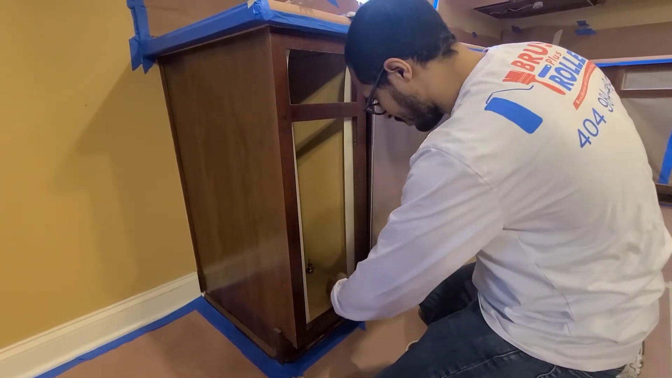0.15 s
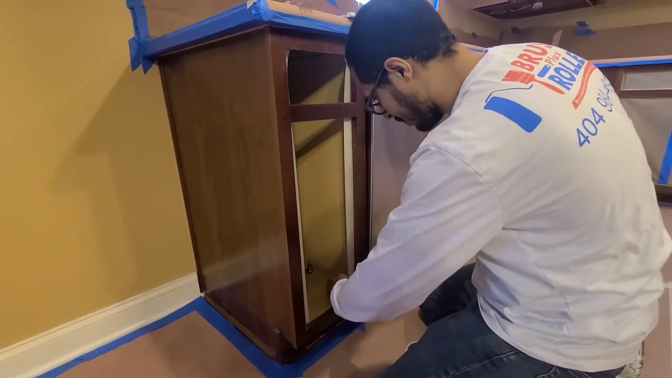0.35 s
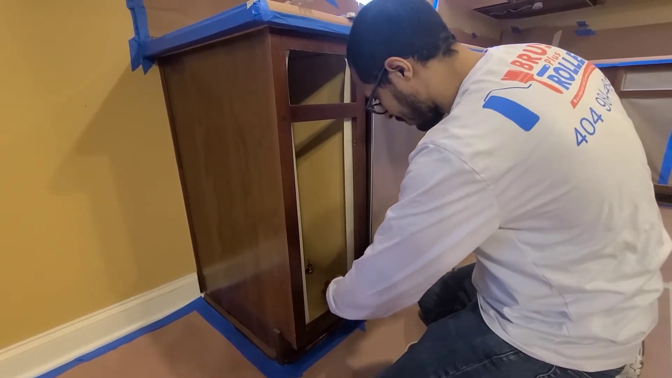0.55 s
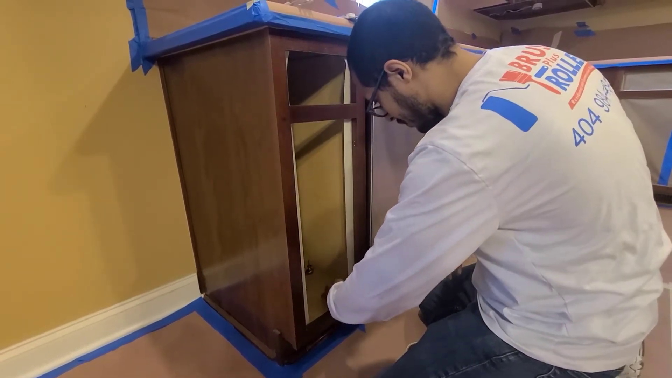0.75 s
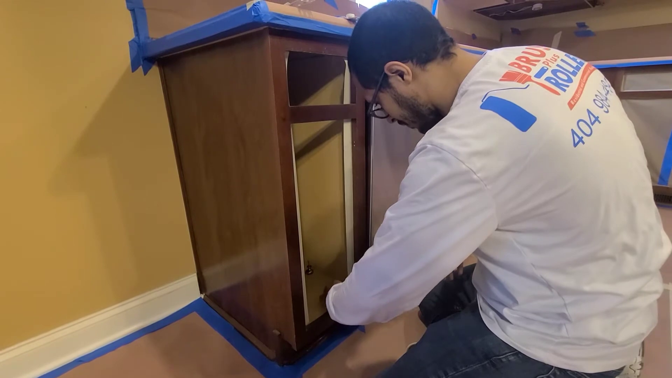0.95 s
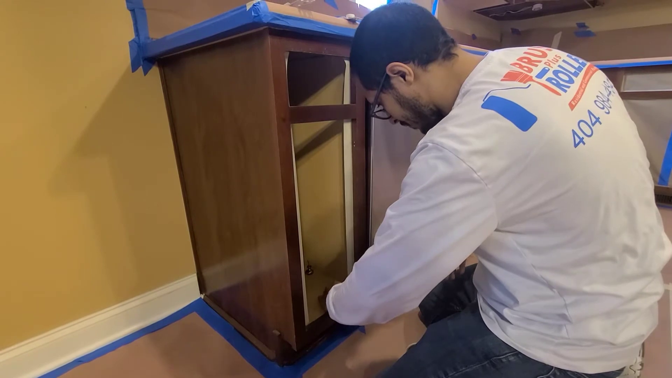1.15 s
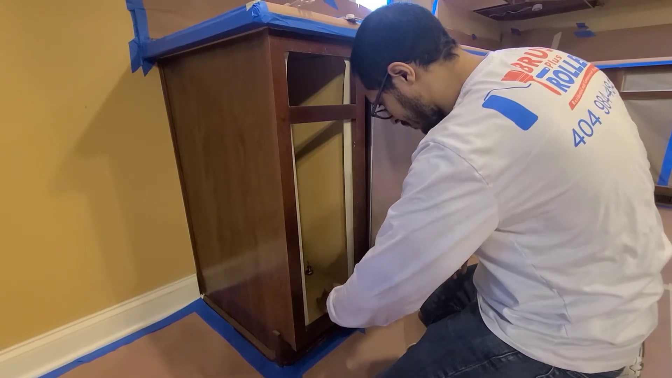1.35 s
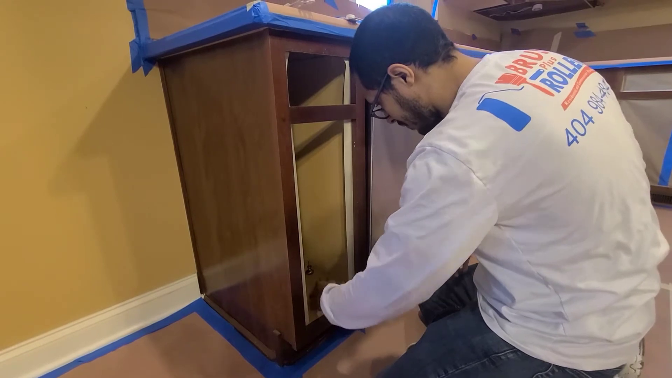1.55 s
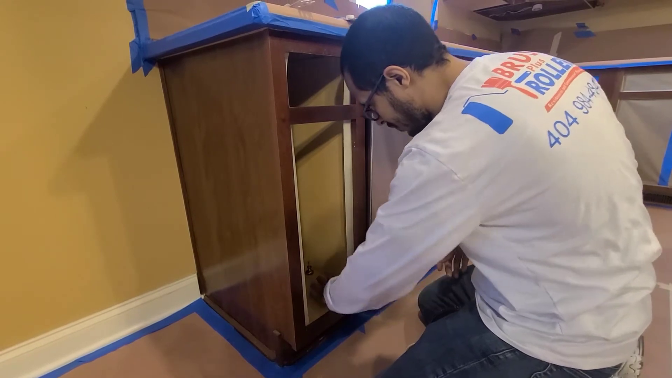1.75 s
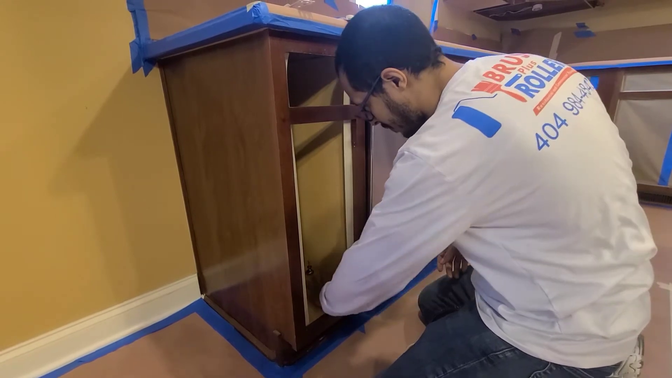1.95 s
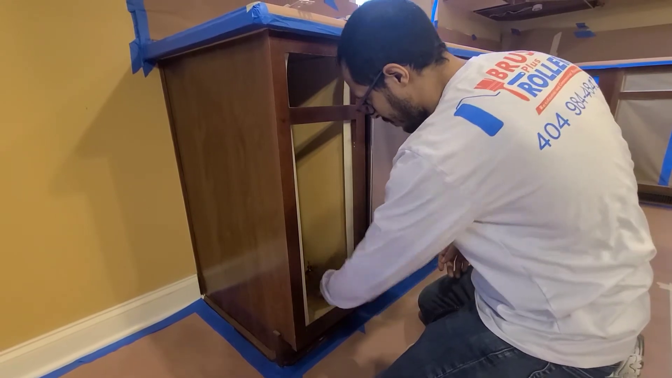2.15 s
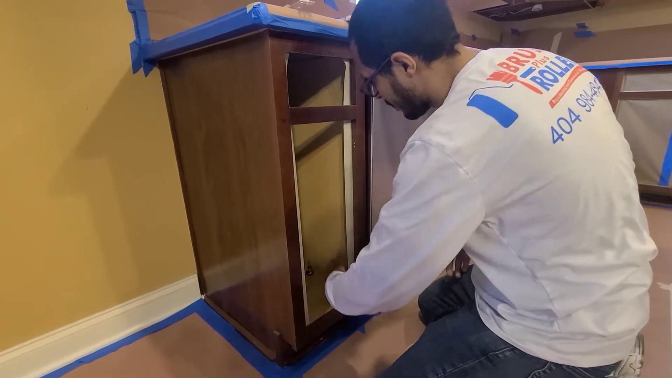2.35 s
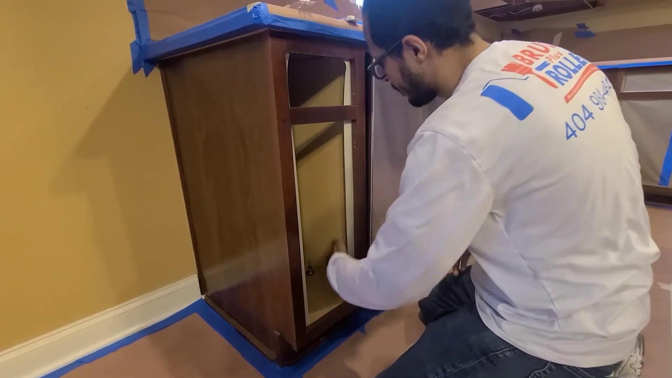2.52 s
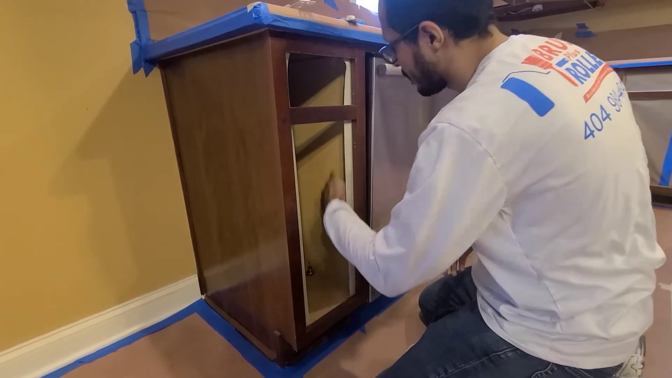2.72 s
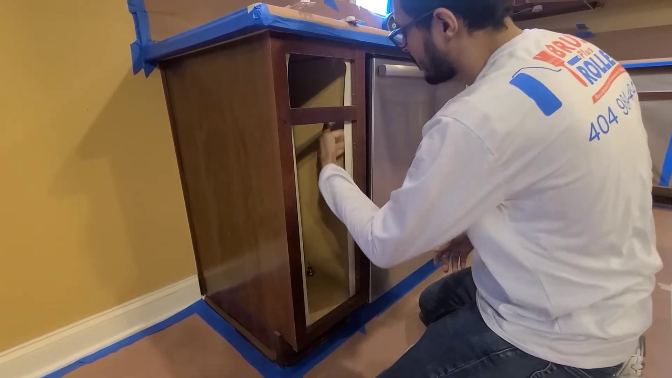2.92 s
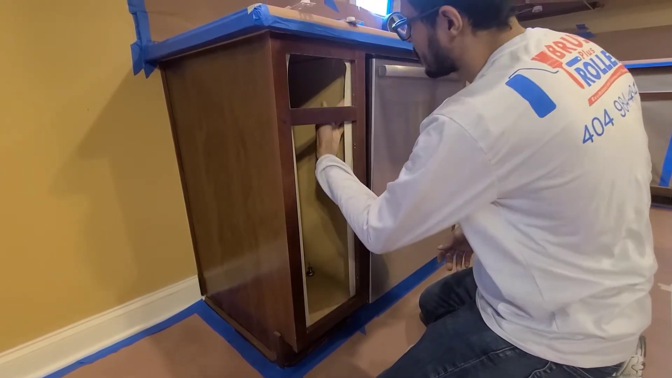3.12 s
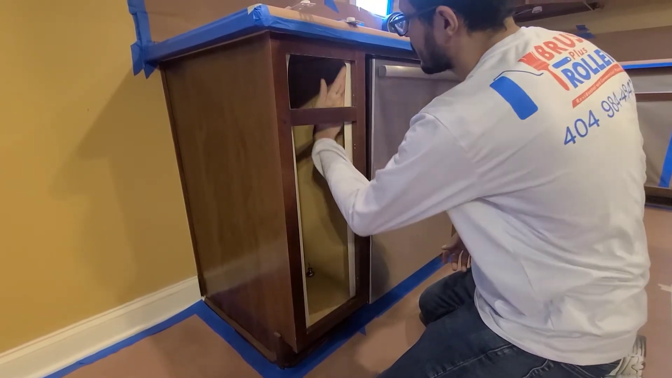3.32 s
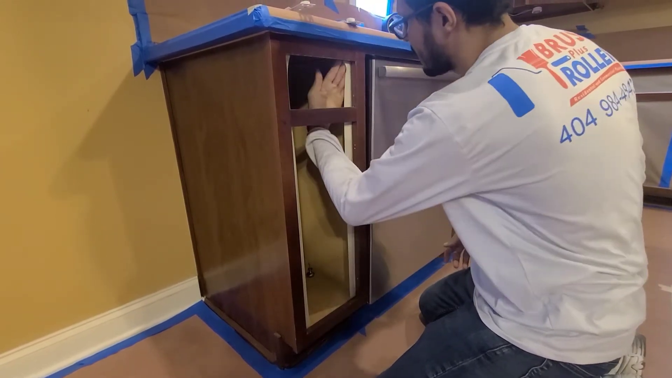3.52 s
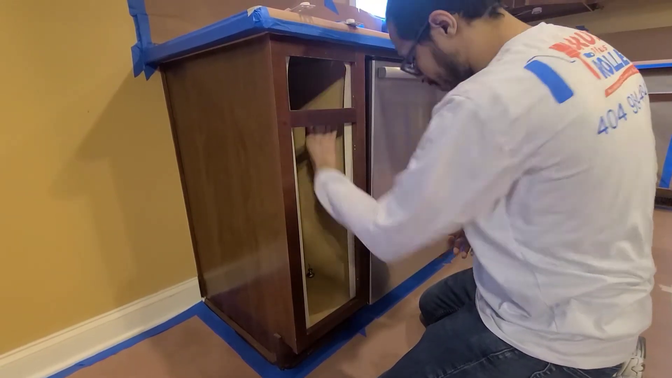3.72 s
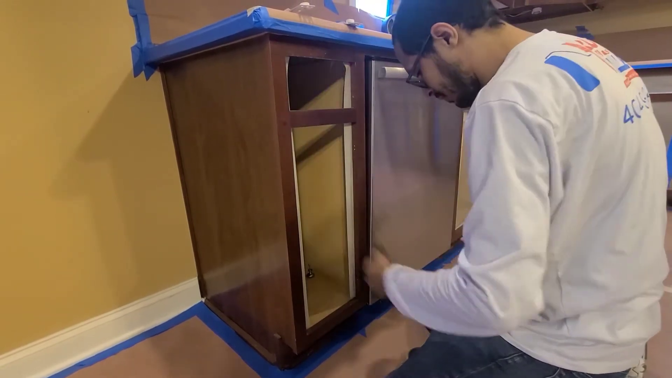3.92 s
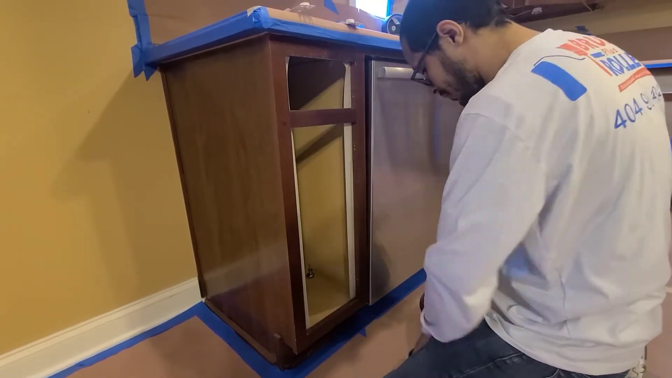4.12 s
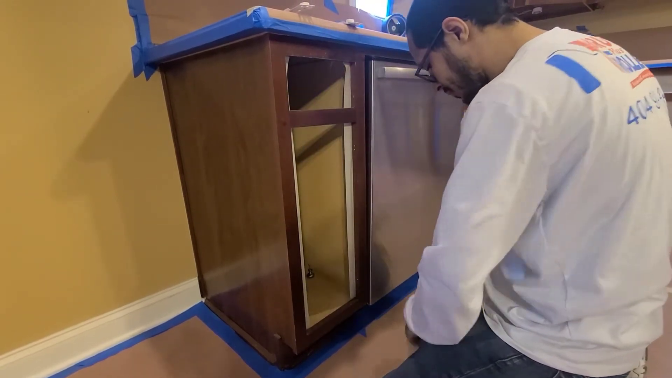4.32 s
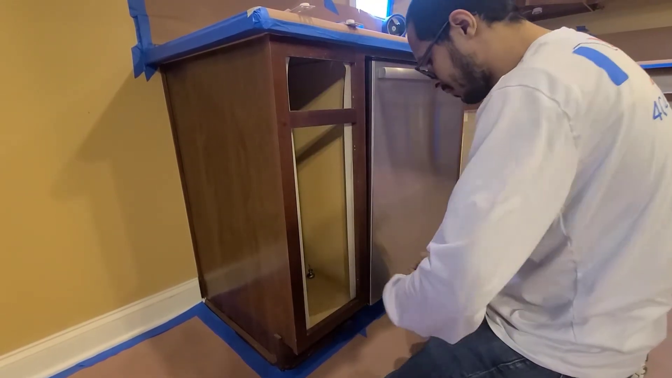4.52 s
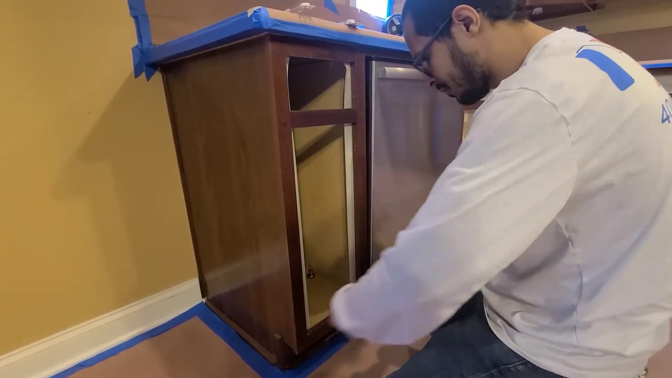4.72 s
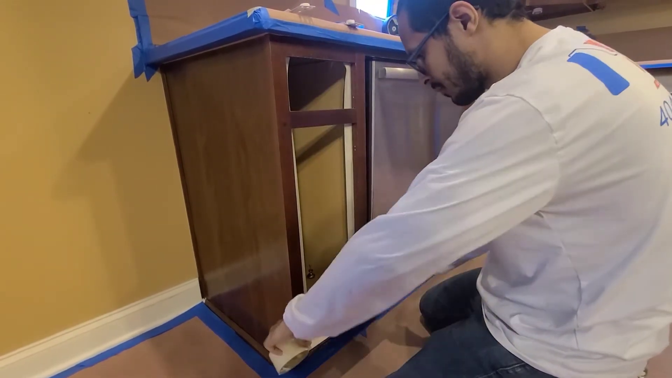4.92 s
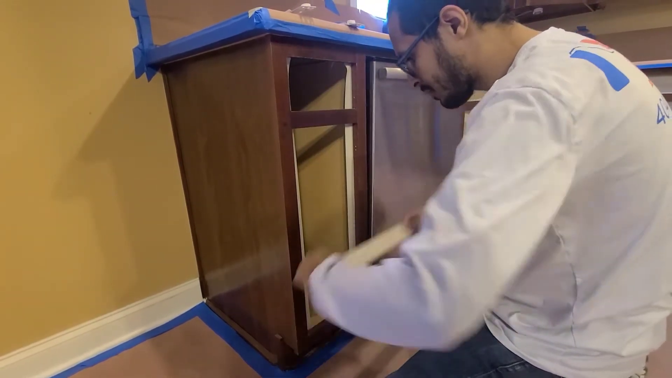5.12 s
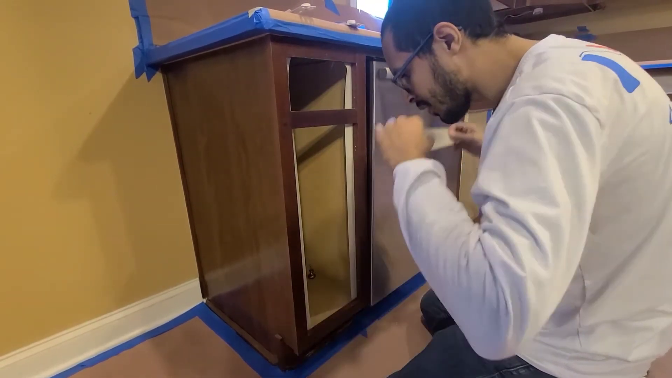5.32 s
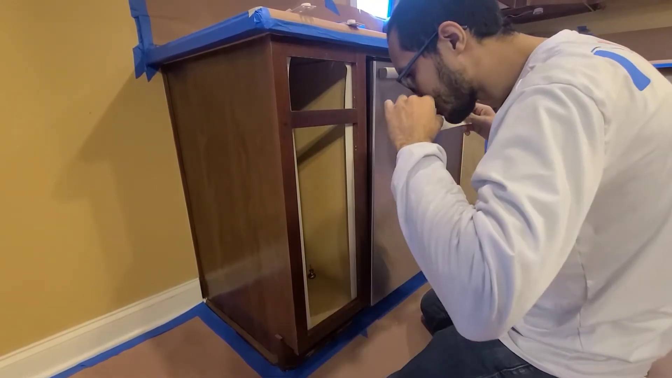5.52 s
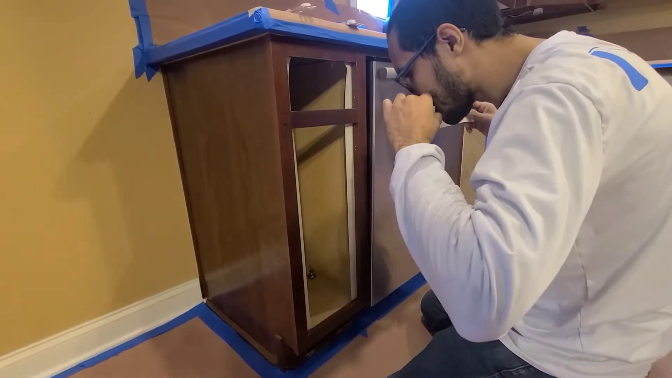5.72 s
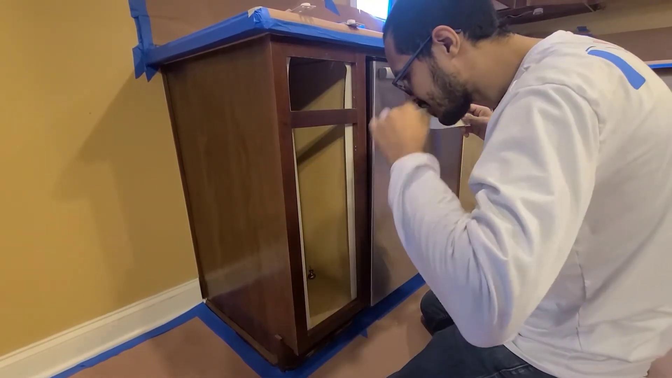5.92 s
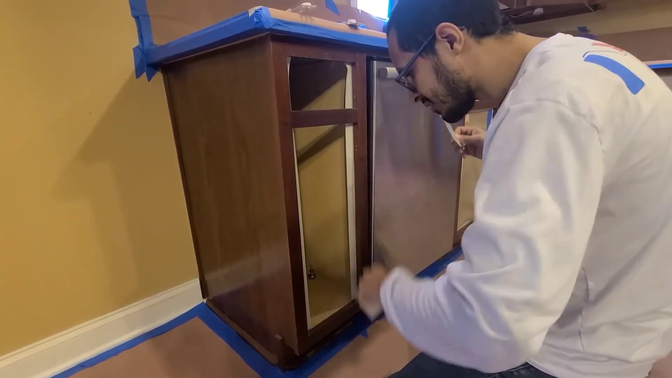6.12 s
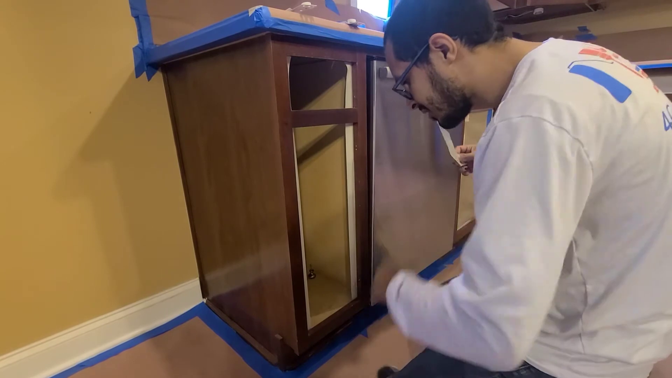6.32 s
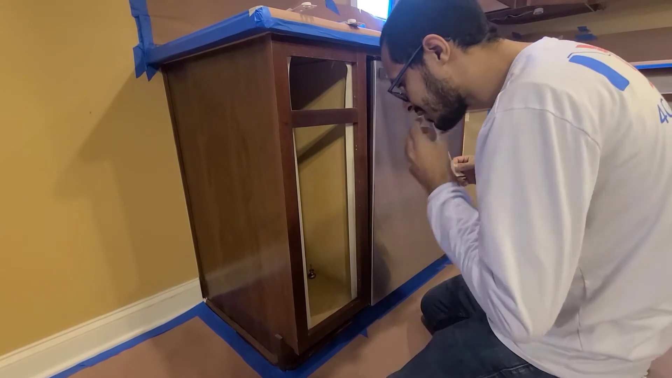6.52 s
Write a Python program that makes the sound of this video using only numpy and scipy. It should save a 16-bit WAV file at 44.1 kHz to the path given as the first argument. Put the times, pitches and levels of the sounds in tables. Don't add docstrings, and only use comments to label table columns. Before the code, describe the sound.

In a bare, live room with a faint low appliance hum, hands slide over paper inside a wooden cabinet: soft rustles, small squeaks, creases, a hard knock. A brief crumple follows, then another knock. Sticky ticks lead into a loud, ripping burst of masking tape; after a pause it tears with a crisp snap, and the roll drops on the floor with a double clack. Close stereo microphone.

```python
import sys
import numpy as np
from scipy import signal
from scipy.fft import rfft, irfft, next_fast_len
from scipy.io import wavfile
from scipy.ndimage import uniform_filter1d, minimum_filter1d, map_coordinates

SR = 44100
rng = np.random.default_rng(int(sys.argv[2]) if len(sys.argv) > 2 else 0)


def master(y):
    cut = np.clip(np.atleast_2d(y).T, -1, 1)
    pcm = np.round(cut * 32767)
    wavfile.write(sys.argv[1], SR, pcm.astype(np.int16))


def undo_db(level):
    steps = np.asarray(level, float) / 20
    return 10 ** steps


N = 293706


def unit(x):
    return x / np.sqrt(np.mean(x ** 2) + 1e-20)


def along(points, hz):
    f, v = np.transpose(points)
    return np.interp(np.log(hz + 1), np.log(f + 1), v)


def filtered(x, response):
    m = next_fast_len(x.shape[-1] + 8192)
    return irfft(rfft(x, m) * response(np.fft.rfftfreq(m, 1 / SR)), m)[..., :x.shape[-1]]


def pan(pan_db):
    return undo_db([[pan_db / 2], [-pan_db / 2]])


def add(track, s, sound):
    part = track[..., round(s * SR):][..., :sound.shape[-1]]
    part += sound[..., :part.shape[-1]]


def wobble(rate):
    at = np.arange(0, N + 16, 16)
    knots = rng.standard_normal(int(N * rate / SR) + 4)
    return np.interp(np.arange(N), at, map_coordinates(knots, [at * rate / SR]))


def gains(rows, grows=1):
    s, db = np.transpose(rows)
    out, t = np.zeros(N), np.arange(s[0], s[-1], 1 / SR)
    swing_db = grows * (db - db.max())
    add(out, s[0], undo_db(np.interp(t, s, db.max() + swing_db)))
    return out


def swells(rows, lift_db=0):
    s, rise, fall, db = np.array([row[:4] for row in rows]).T[..., None]
    t = np.arange(0, N / SR + .002, .001)
    late = t - s
    drop = np.where(late < 0, -late / np.abs(rise), late / np.abs(fall))
    return np.interp(np.arange(N) / SR, t, undo_db(db + lift_db - 20 * drop).sum(axis=0))


def crackle(spectrum, rate, spread_db, clumps, clump_db):
    size = undo_db(spread_db * np.minimum(rng.exponential(1, N), 3))
    bonds = (rng.random(N) < rate / SR) * rng.standard_normal(N) * size
    bunched = bonds * undo_db(clump_db * wobble(clumps))
    return unit(filtered(bunched, lambda hz: undo_db(along(spectrum, hz))))


def ring(rows, hz, t60):
    out, t = np.zeros(N), np.arange(SR // 4) / SR
    for s, db, *_ in rows:
        add(out, s, undo_db(db - 60 * t / t60) * np.sin(2 * np.pi * hz * t))
    return out


def struck(spectrum, size=8192):
    level = undo_db(along(spectrum, np.fft.rfftfreq(size, 1 / SR)))
    cepstrum = irfft(np.log(level + 1e-6))
    cepstrum[1:size // 2] *= 2
    cepstrum[size // 2 + 1:] = 0
    return irfft(np.exp(rfft(cepstrum)))


def slips(rows, lift_db, cycles, rough):
    out = np.zeros((2, N))
    for s, db, hz, pan_db in rows:
        turns = np.arange(SR // 40) / SR * hz / cycles

        def band(f):
            return 1 / (1 + (1.5 * np.log((f + 1) / hz)) ** 4) / (1 + (f / 6600) ** 16)

        rasp = unit(filtered(rng.standard_normal(len(turns)), band))
        tone = np.sqrt(2) * np.sin(2 * np.pi * (turns * cycles + rng.random()))
        shape = undo_db(db + lift_db) * turns * np.exp(1 - turns)
        add(out, s - cycles / hz, shape * (tone + rough * rasp) * pan(pan_db))
    return out


# f/Hz, correlation/1
LIKENESS = [(60, -0.35), (150, 0.93), (380, 0.91), (950, 0.056), (2380, -0.035), (5980, -0.092),
            (15000, -0.16)]


def ports(pair):
    def turn(hz):
        return np.arccos(np.clip(along(LIKENESS, np.maximum(hz, 140)), -1, 1)) / 2

    def mid_side(hz):
        return np.sqrt(2) * np.array([np.cos(turn(hz)), np.sin(turn(hz))])

    mid, side = filtered(pair, mid_side)
    return np.array([mid + side, mid - side]) / np.sqrt(2)


# f/Hz, T60/s
ROOM_T60 = [(100, 0.45), (700, 0.55), (2500, 0.52), (5000, 0.43), (9000, 0.32), (15000, 0.27)]


def paths(near_db, far_db):
    hz, t, z = signal.stft(rng.standard_normal((2, SR * 2 // 3)), SR, nperseg=256)
    tail = signal.istft(z * undo_db(-60 * t / along(ROOM_T60, hz)[:, None]), SR, nperseg=256)[1]
    t = np.arange(tail.shape[1]) / SR
    tail = ports(tail) * np.clip(t / 0.00076, 0, 1)
    near = ports(rng.standard_normal(tail.shape)) * undo_db(-60 * t / 0.032) * np.clip(t / 0.00052, 0, 1)
    answer = undo_db(far_db) * tail / np.linalg.norm(tail[0]) + undo_db(near_db) * near / np.linalg.norm(near[0])
    answer[:, 0] = 1
    spectrum = rfft(answer, SR)
    power = uniform_filter1d(np.abs(spectrum) ** 2, size=200, axis=1)
    return irfft(spectrum / np.sqrt(power), SR)[:, :len(t)]


def room(x, near_db, far_db, pan_db, count=1, dwell=.04):
    x, heard = np.atleast_2d(x), np.zeros((2, N))
    start, end = np.flatnonzero(np.abs(x[0]) > 1e-8)[[0, -1]]
    place = np.arange(start, end) / SR / dwell
    for k in range(count):
        away = np.abs((place - k + count / 2) % count - count / 2)
        share = np.cos(np.pi / 2 * np.clip(away, 0, 1)) if count > 1 else 1
        add(heard, start / SR, signal.fftconvolve(x[:, start:end] * share, paths(near_db, far_db), axes=1))
    return heard * pan(pan_db)


# f/Hz, level/dB
AIR = [(12, -35), (20, -11), (43, -1), (68, -3.5), (113, -15.5), (167, -14.5), (203, -13), (920, -27),
       (1150, -21), (1360, -26), (3520, -34.5), (6150, -43.5), (7270, -63.5), (11400, -55.5), (15900, -61)]
# f/Hz, density/dB per Hz
BOARDS = [(12, -51), (30, -23.5), (48, -6), (80, 9), (105, 3), (140, -34.5), (300, -120)]
# t/s, rise/s, fall/s, level/dB
SHIFTS = [(.2, .2, .2, -59), (1.13, 0.18, .2, -63), (2.0, 0.26, 0.087, -58), (2.3, 0.044, 0.052, -42),
          (2.53, 0.048, 0.24, -48), (3.1, 0.026, .2, -48), (3.68, 0.043, .2, -49.5),
          (4.13, 0.14, 0.11, -57), (4.31, 0.34, 0.17, -50), (4.86, 0.22, 0.11, -48.5), (5.3, .2, 0.21, -55),
          (5.8, 0.061, 0.094, -51), (5.92, 0.033, 0.052, -46)]


def air():
    t = np.arange(N) / SR
    phase = 2 * np.pi * np.cumsum(np.where(t < 1.17, 55.95, 57)) / SR
    hum = undo_db(-51.5 + 5 + 1.2 * wobble(9)) * np.sin(phase)
    fan_hz = 163.5
    fan = unit(filtered(rng.standard_normal(N), lambda hz: 1 / (1 + ((hz - fan_hz) / 5) ** 2))) * undo_db(-71)
    fan = fan + undo_db(-61) * np.sin(2 * np.pi * fan_hz * t + 0.5 * wobble(8))
    hiss = filtered(ports(rng.standard_normal((2, N))),
                    lambda hz: undo_db(along(AIR, hz)) * (np.abs(hz - 57) > 9))
    boards = (swells(SHIFTS) + undo_db(-75)) * crackle(BOARDS, 1200, 0.88, 9.0, 0.99)
    return undo_db(-56.5 + 2 + 0.35 * wobble(1.8)) * unit(hiss) + (hum + fan + boards) * pan(-0.8)


# f/Hz, density/dB per Hz
PAPER = [(410, -12), (700, -1.5), (851, -7.5), (1120, -2.5), (1910, -3.5), (2230, -7.5), (3670, -3.5),
         (5870, -16), (7200, -33), (9360, -61.5), (15800, -120)]
# f/Hz, density/dB per Hz
SHEEN = [(4240, -27.5), (7200, -9.5), (7600, -11), (11700, -3), (15500, -8)]
# f/Hz, density/dB per Hz
BODY = [(59, -35), (100, 1), (146, -8.5), (270, 0), (353, -4.5), (756, -9.5), (1000, -39), (1300, -54),
        (2200, -120)]
# t/s, rise/s, fall/s,
# rustle level/dB, fizz over it/dB
STROKES = [(0.0, 0.0086, 0.36, -46.5, -24), (.404, 0.011, 0.017, -52.5, -28),
           (0.578, 0.025, 0.087, -47.5, -20), (1.22, 0.041, 0.023, -55, -27), (1.455, 0.2, 0.1, -57, -34.5),
           (1.695, 0.059, 0.11, -57.5, -35), (1.91, 0.096, 0.15, -49.5, -16),
           (2.24, 0.0032, 0.01, -51.5, -42), (2.46, 0.067, 0.61, -46, -21), (2.59, 0.08, 0.1, -50, -18),
           (2.78, 0.14, 0.07, -41, -3.5), (3.02, 0.17, 0.46, -63.5, -34.5), (3.33, .6, 0.12, -53.5, -15),
           (3.502, 0.04, 0.059, -53.5, -27), (4.099, 0.013, 0.064, -50.5, -24),
           (4.24, 0.14, 0.2, -61.5, -19), (4.438, 0.027, 0.1, -59.5, -12), (4.495, 0.019, 0.03, -49, -3),
           (4.625, 0.036, .01, -55.5, -11.5), (5.26, 0.052, .08, -64.5, -32),
           (5.659, 0.018, 0.017, -42.5, -33.5), (5.77, 0.039, 0.19, -54.5, -9),
           (6.256, 0.024, 0.0045, -40, -34.5)]
# t/s, rise/s, fall/s, level/dB
LEANS = [(.02, 0.075, 0.48, -54), (.405, .015, 0.026, -55), (.455, .015, 0.015, -64), (.56, 0.12, .25, -69),
         (1.22, 0.063, 0.049, -59.5), (1.45, 0.061, 0.12, -58.5), (1.7, 0.12, 0.11, -53.5),
         (2.24, 0.0082, 0.077, -42), (2.59, 0.045, 0.082, -55), (2.77, 0.44, 0.43, -48.5),
         (3.11, .1, 0.11, -70), (3.335, 0.1, 0.25, -56.5), (4.102, 0.017, 0.05, -38),
         (4.15, 0.017, 0.083, -42.5), (4.438, 0.036, 0.018, -50.5), (5.3, 0.17, .3, -67.5)]


def hands():
    fizz = swells(STROKES, np.array(STROKES)[:, -1:]) * crackle(SHEEN, 5300, 2.2, 62, 1.9)
    paper = swells(STROKES) * crackle(PAPER, 7000, 2.7, 60, 0.82)
    wood = (swells(LEANS) + undo_db(-65.5)) * crackle(BODY, 1500, 1.5, 25, 2)
    return paper + fizz + wood


# t/s, length/s, start f/Hz, end f/Hz, level/dB
SQUEAKS = [
    (.01, 0.125, 3240, 3200, -63.5),
    (0.197, .095, 1985, 1982, -59),
    (.3, 0.09, 2000, 1980, -74),
    (0.502, 0.045, 4430, 4400, -71),
    (1.88, .08, 860, 850, -66),
    (2.307, .08, 2050, 1510, -67),
    (2.336, 0.07, 2550, 2200, -66),
    (2.406, .065, 2070, 2090, -57.5),
    (5.5, 0.03, 770, 752, -64),
]


def squeaks():
    out = np.zeros(N)
    shake, drift = undo_db(1.6 * wobble(90)), .7 * wobble(150)
    for s, length, start_hz, end_hz, db in SQUEAKS:
        t = np.arange(int(length * SR)) / SR
        glide_hz = start_hz + (end_hz - start_hz) * t / length
        phase = 2 * np.pi * np.cumsum(glide_hz) / SR + drift[round(s * SR):][:len(t)]
        octave = undo_db(-13) * min(1, 2000 / start_hz) ** 2 * np.sin(2 * phase)
        shape = undo_db(db + 9.5) * np.sin(np.pi * t / length) ** 0.099
        add(out, s, shape * (np.sin(phase) + octave))
    return out * shake


# f/Hz, density/dB per Hz
EDGE = [(2410, -29.5), (4100, -14.5), (5190, -7), (6460, -7), (7100, -19.5), (9230, -43.5), (15600, -120)]
# t/s, rise/s, fall/s, level/dB
SCUFFS = [(.04, 0.12, 0.15, -60), (1.91, 0.056, .1, -60.5), (2.47, 0.072, 0.16, -57.5),
          (2.58, .1, 0.1, -63.5), (2.99, .05, 0.28, -67), (2.72, 0.047, .05, -49), (2.79, .07, 0.036, -46),
          (3.34, 0.19, 0.048, -62.5), (4.1, 0.012, .08, -60.5), (4.5, 0.014, .05, -56),
          (4.618, .03, .03, -51.5), (5.75, 0.011, 0.095, -52)]


def scuffs():
    return swells(SCUFFS) * crackle(EDGE, 6000, 2.5, 90, 1.5)


def snaps(rows, t60):
    out, t = np.zeros((2, N)), np.arange(SR // 8) / SR
    for s, db, colour_hz, fizz_db, pan_db in rows:
        def colours(hz):
            peak = 0.056 + 1 / (1 + (3 * np.log((hz + 1) / colour_hz)) ** 2)
            broad = peak / (1 + (hz / 6800) ** 16) / (1 + (700 / (hz + 1)) ** 3)
            return np.array([broad, undo_db(along(SHEEN, hz))])

        noise = filtered(rng.standard_normal((2, len(t))), colours)
        pop = (1300 / colour_hz) ** 2 * np.sin(2 * np.pi * colour_hz * t)
        burst = unit(noise[0]) + pop + undo_db(fizz_db) * unit(noise[1])
        add(out, s, burst * undo_db(db - 2.0 - 60 * t / t60) * pan(pan_db))
    return out


# t/s, peak level/dB, colour f/Hz, fizz/dB, left-right/dB
CREASES = [(0.0715, -36, 3000, -34, -4), (0.175, -49, 3240, -36, -1), (0.4021, -40.5, 1150, -31, -3),
           (0.4445, -36.5, 1360, -50, 0), (0.5748, -47, 3240, -38, 6.5), (1.2223, -42.5, 1630, -19, 1),
           (1.6355, -45.5, 1510, -41.5, -4), (1.677, -45, 1620, -41, 0), (2.6923, -45, 1210, -10, 0.5),
           (2.7063, -37.5, 1820, 3.5, -3), (2.7334, -36, 1120, -2.5, -9), (2.7484, -45, 1170, -12.5, 3.5),
           (2.7637, -32, 3690, -11.5, -9.5), (3.046, -40, 3900, -34, -7), (3.0887, -54, 3065, -33, -2.5),
           (3.507, -40, 3300, -30, -1), (4.2347, -56, 1005, -30, -2)]
# t/s, peak level/dB, colour f/Hz, fizz/dB, left-right/dB
TACKS = [
    (4.4262, -51, 1060, -40, -5),
    (4.4366, -36.5, 2920, -25.5, -3.5),
    (4.4805, -40.5, 5900, -27.5, -16.5),
    (4.4877, -31, 5740, -8.5, -10.5),
    (4.616, -35.5, 6000, -29, -0.5),
    (4.6337, -23.5, 3610, -19, -6),
    (5.6531, -27, 3100, -21.5, -2.5),
    (5.741, -21.5, 1970, -21, -3),
    (5.7834, -51, 3320, 4, -7.5),
    (6.543, -61, 5000, 4.5, -6),
]


def clicks():
    return snaps(CREASES, t60=0.011) + snaps(TACKS, t60=0.0061)


# t/s, peak level/dB, f/Hz, left-right/dB
DENTS = [
    (.177, -44, 3300, 0),
    (.446, -37.5, 1330, -1),
    (1.99, -58, 3700, -1),
    (2.03, -55, 3800, -1),
    (2.06, -56, 3650, -1),
]


def dents():
    return slips(DENTS, lift_db=-1, cycles=1.35, rough=0.53)


# t/s, peak level/dB, click level/dB
KNOCKS = [
    (2.23, -28.5, -6.5),
    (2.275, -39.5, -72),
    (3.095, -54, -50),
    (4.094, -37.5, -8.5),
    (4.149, -46.5, -20),
    (4.225, -50.5, -9.5),
]
# f/Hz, level/dB, T60/s
PANEL_MODES = [(110, 1, 0.13), (170, -2, 0.048), (261, -3.5, 0.09), (414.6, -1.5, 0.061),
               (557.4, -1, 0.058), (760, 4, .05), (1166, -2, 0.034)]


def knocks():
    out, t = np.zeros(N), np.arange(SR // 3) / SR
    for s, db, click_db in KNOCKS:
        panels = 0
        for hz, level, t60 in PANEL_MODES:
            panels = panels + undo_db(level + rng.normal(0, 6.0) - 60 * t / t60) * np.sin(2 * np.pi * hz * t)
        click = unit(filtered(rng.standard_normal(len(t)),
                              lambda hz: undo_db(along(PAPER, hz)) / (1 + (hz / 4300) ** 4)))
        click = click * undo_db(click_db + 7.5 - 60 * t / 0.032)
        add(out, s, undo_db(db - 7) * (panels + click) * (1 - np.exp(-t / 0.001)))
    return out


# t/s, peak level/dB, f/Hz, left-right/dB
CRUMPLES = [(2.6843, -52, 2080, -3), (2.6988, -41, 1790, -1), (2.7055, -46, 3200, 0),
            (2.7201, -33.5, 3250, -2), (2.7263, -44, 3350, -2), (2.7341, -40, 3550, -3),
            (2.7511, -32, 3800, -4), (2.7583, -51, 3020, -1), (2.7654, -33.5, 3460, -5),
            (2.7742, -43, 3170, 0), (2.7808, -37, 3180, -2), (2.792, -37.5, 3440, 0),
            (2.8122, -43, 1760, -1), (2.8212, -46, 1720, -8), (2.8282, -67, 2810, -4)]
# t/s, peak level/dB, f/Hz, left-right/dB
STICKS = [(4.4854, -43.5, 5810, -6), (4.4895, -34.5, 5680, -5), (4.4951, -37, 5580, -6.5),
          (4.5003, -40, 5350, -4.5), (4.5049, -43, 4910, -3), (4.509, -44, 5360, -4),
          (4.5182, -44.5, 5170, -3), (4.5225, -50.5, 5730, -2)]


def touches():
    return slips(CRUMPLES, lift_db=-7, cycles=4.3, rough=1.1) + slips(STICKS, lift_db=-4.5, cycles=6.4, rough=0.98)


# t/s, level/dB
PEEL = [
    (4.633, -38),
    (4.644, -24.5),
    (4.675, -26.5),
    (4.705, -17.5),
    (4.73, -19),
    (4.757, -18),
    (4.8, -22.5),
    (4.82, -19.5),
    (4.885, -42.5),
]
# f/Hz, density/dB per Hz
GLUE = [(500, -38.5), (850, -6), (885, -17.5), (1050, -10.5), (1640, -9), (2530, -10), (4300, -5.5),
        (5590, -17), (9460, -120)]
# f/Hz, density/dB per Hz
FIZZ = [(4240, -32), (7200, -6), (8290, -6.5), (11800, -6), (15500, -8)]
# f/Hz, density/dB per Hz
SPAN = [(59, -53), (100, -23), (372, 1.5), (591, -0.5), (891, -19), (1100, -21.5), (1430, -23.5),
        (2420, -120)]
# t/s, rise/s, fall/s, level/dB
JERKS = [
    (4.68, 0.017, 0.061, -41),
    (4.725, 0.082, 0.021, -36.5),
    (4.82, 0.093, 0.088, -32.5),
]
# t/s, peak level/dB
TWANGS = [
    (4.706, -23),
    (4.836, -28.5),
]


def peel():
    effort = gains(PEEL)
    tugs = crackle(SPAN, 500, 4.8, 70, 1.84) * swells(JERKS) * (effort > 1e-6)
    edge = undo_db(-4.5) * crackle(EDGE, 12000, 1.3, 220, 2.1)
    fizz = undo_db(-7) * gains(PEEL, grows=0.83) * crackle(FIZZ, 14200, 1.6, 160, 0.73)
    glue = effort * (crackle(GLUE, 8000, 3.2, 150, 1.0) + edge)
    return glue + fizz + tugs + ring(TWANGS, hz=270, t60=0.13)


# t/s, peak level/dB, f/Hz, left-right/dB
RIPS = [(4.6421, -20.5, 3770, -1), (4.6518, -22.5, 3570, -0.5), (4.6662, -24, 3210, -1.5),
        (4.6764, -22, 4130, 1.5), (4.6868, -17.5, 3780, -1.5), (4.6928, -15, 3240, -1),
        (4.6986, -12.5, 2400, -5), (4.7091, -13.5, 2370, 0), (4.7265, -17.5, 1296, -2),
        (4.7339, -18, 1990, -1), (4.7393, -15.5, 4690, -2.5), (4.75, -9.5, 2980, -3),
        (4.7566, -12, 2890, -1), (4.7676, -12, 3340, -0.5), (4.7774, -15, 4185, -1), (4.7834, -15, 6230, 4),
        (4.7973, -14.5, 5630, -1), (4.8035, -19.5, 3930, 0.5), (4.8097, -13.5, 3904, 2.5),
        (4.8276, -14, 3340, 0), (4.84, -18, 4300, -2.5), (4.8521, -20.5, 3320, -4)]
# t/s, peak level/dB, f/Hz, left-right/dB
PLUCKS = [(4.6553, -27, 620, -2.5), (4.6785, -22, 620, -1.5), (4.6898, -25.5, 494, 0.5),
          (4.6983, -19, 540, -1), (4.714, -22, 332, -1.5), (4.7294, -17, 594, -2),
          (4.7405, -24.5, 537, -3.5), (4.7617, -31.5, 530, -0.5), (4.7701, -29, 590, -3.5),
          (4.7841, -26, 640, -2), (4.7988, -23, 779.5, -1), (4.8084, -27, 373.5, 2.5),
          (4.825, -24, 384, -2), (4.843, -29, 330, -0.5)]


def glue_slips():
    return slips(RIPS, lift_db=-8, cycles=2.6, rough=1.3) + slips(PLUCKS, lift_db=-4, cycles=1.2, rough=0.18)


# t/s, level/dB
TEAR = [
    (5.844, -51),
    (5.868, -29.5),
    (5.878, -27),
    (5.892, -17.5),
    (5.906, -23),
    (5.912, -34),
    (5.922, -27.5),
    (5.944, -28.5),
]
# f/Hz, density/dB per Hz
FIBRE = [(1100, -34), (2000, -13), (3000, 1), (4500, 2.5), (6200, -3.5), (7200, -17.5), (9400, -61),
         (15800, -120)]
# f/Hz, density/dB per Hz
FLAP = [(180, -56), (350, -11.5), (700, -0.5), (1130, 3), (1700, 3), (2300, 0), (3200, -44), (5300, -120)]
# t/s, rise/s, fall/s, level/dB
FLAPS = [
    (5.866, 0.012, .02, -35.5),
    (5.895, 0.024, 0.026, -20),
    (5.935, 0.043, .03, -35.5),
]


def tear():
    effort = gains(TEAR)
    flap = swells(FLAPS) * (effort > 1e-6) * crackle(FLAP, 3000, 2.7, 150, 2)
    fibres = effort * crackle(FIBRE, 7300, 3.8, 300, 2.0)
    sheen = undo_db(-13) * gains(TEAR, grows=.5) * crackle(SHEEN, 9000, 2.2, 300, 1.8)
    return fibres + flap + sheen


# t/s, peak level/dB, f/Hz, left-right/dB
PARTS = [(5.8467, -39.5, 3340, 0.5), (5.8579, -33, 3620, -1.5), (5.8641, -25.5, 4300, -5),
         (5.8789, -16, 3040, -2), (5.885, -16.5, 2990, -1.5), (5.8915, -12.5, 4330, 2.5),
         (5.8973, -15, 4450, -3), (5.9089, -25.5, 3440, 1.5), (5.9168, -21.5, 4750, -4),
         (5.9278, -22, 4260, -4), (5.9395, -22, 3320, 4.5), (5.9449, -25, 3080, 1)]
# t/s, peak level/dB, f/Hz, left-right/dB
WHIPS = [(5.8704, -28.5, 780, -0.5), (5.879, -30, 1100, 0), (5.889, -12, 1664, -0.5),
         (5.8939, -23, 1133, -2.5), (5.8989, -19.5, 973, -7), (5.9048, -18.5, 847, -0.5),
         (5.9228, -28.5, 1640, -9), (5.9268, -20, 1820, -4), (5.9361, -25, 1816, 0.5),
         (5.9413, -25, 1850, -1.5)]


def fibre_slips():
    return slips(PARTS, lift_db=-7, cycles=2.6, rough=1.1) + slips(WHIPS, lift_db=-5.5, cycles=1.3, rough=0.89)


# t/s, peak level/dB, contact brightness f/Hz
LANDING = [
    (6.2588, 0, 2100),
    (6.284, 3.5, 7030),
]
# f/Hz, density/dB per Hz
CORE = [(41, -48.5), (80, 0), (240, -3), (520, -6.5), (950, -1), (1250, -5), (1600, -0.5), (2300, -7),
        (3000, -8.5), (4400, -17), (5400, -27), (9000, -59), (12000, -94)]
# t/s, level/dB, f/Hz
RIMS = [
    (6.2581, -8.5, 1300),
    (6.2606, -12.5, 790),
    (6.2843, -4, 2110),
    (6.2855, -14.5, 2900),
    (6.296, -20.5, 3270),
    (6.4155, -20, 1000),
]


def roll():
    blows, t = np.zeros(N), np.arange(SR // 20) / SR
    for s, db, contact_hz in LANDING:
        blow = signal.lfilter(*signal.butter(1, contact_hz, fs=SR), struck(CORE))
        blow = signal.lfilter(*signal.butter(1, 0.042 * contact_hz, 'high', fs=SR), blow)
        add(blows, s - .0003, -undo_db(db) * blow / np.abs(blow).max())
        spray = filtered(rng.standard_normal(len(t)), lambda hz: undo_db(along(SHEEN, hz)))
        add(blows, s, spray * undo_db(db - 43.5 - 60 * t / 0.0088))
    soften = signal.butter(3, 5000, fs=SR)
    for s, db, hz in RIMS:
        rim = ring([(0, db)], hz, t60=13.5 / hz)[:len(t)]
        add(blows, s, -signal.lfilter(*soften, rim))
    heard = room(blows, -5.5, -1.3, -1.6) * undo_db(5.5)
    for port, (delay, db) in enumerate([(.0021, -15), (.0041, -11)]):
        add(heard[port], delay, undo_db(db) * blows)
    return heard + undo_db(-9) * ring(LANDING, hz=998, t60=0.022)


# f/Hz, level/dB, T60/s
FLOOR_MODES = [(66.1, 0.5, 0.68), (121.8, -4.5, 0.34)]


def thud():
    out, t = np.zeros(N), np.arange(SR // 2) / SR
    for hz, db, t60 in FLOOR_MODES:
        add(out, LANDING[0][0], undo_db(-32.5 + db - 60 * t / t60) * np.sin(2 * np.pi * hz * t))
    return out * pan(-0.8)


def scene():
    cabinet = room(hands(), 14, 0.5, -2.2, count=3, dwell=.05) + room(squeaks(), -4.0, -2.2, -1.3)
    paper = room(scuffs(), 5, -1.5, -2.2, count=2, dwell=.05) + room(dents(), -3.5, -10, 0, count=2, dwell=0.23)
    taps = room(clicks(), 0, -0.94, 0, count=2, dwell=0.14) + room(knocks(), -14.0, -2.8, -1)
    touch = room(touches(), 1, -8.5, 0, count=3, dwell=0.013)
    pull = room(peel(), 9.5, 1.4, -1.3, count=4) + room(glue_slips(), -2.5, -5, 0, count=3)
    rip = room(tear(), 1.5, -2.5, -3.5, count=3, dwell=0.019)
    rip = rip + room(fibre_slips(), -3.5, -10.5, 0, count=3, dwell=.021)
    return air() + cabinet + paper + taps + touch + pull + rip + roll() + thud()


def low_pass(x):
    return signal.sosfilt(signal.butter(12, 16460, fs=SR, output="sos"), x)


def record(dry):
    band = filtered(dry, lambda hz: (hz < 15850) * hz ** 2 / (hz ** 2 + 35 ** 2))
    needed = np.minimum(1, .99 / (np.abs(band).max(axis=0) + 1e-9))
    held = uniform_filter1d(minimum_filter1d(needed, size=41), size=21)
    return low_pass(band * held)


dry = scene()
out = record(dry)
master(out)
```